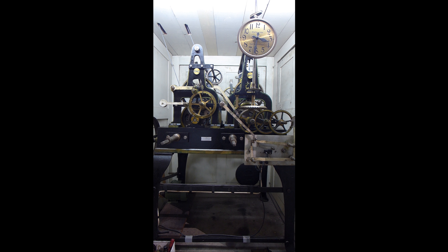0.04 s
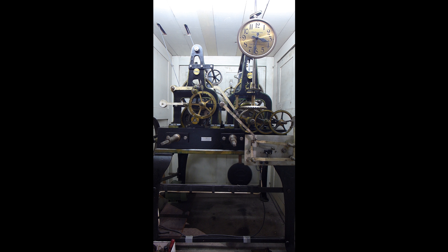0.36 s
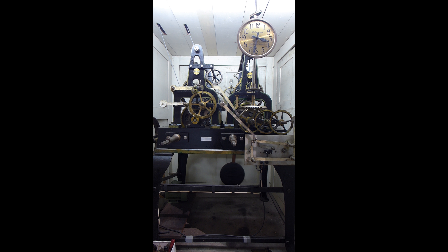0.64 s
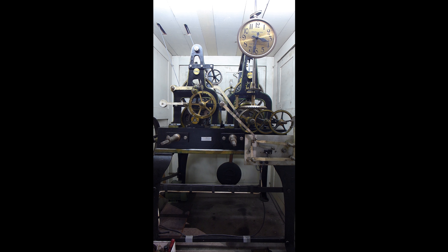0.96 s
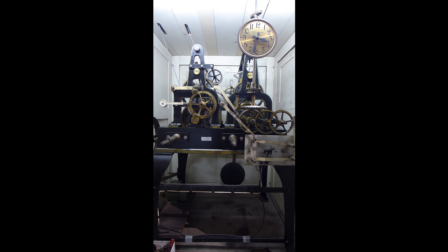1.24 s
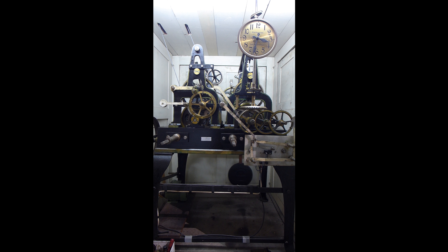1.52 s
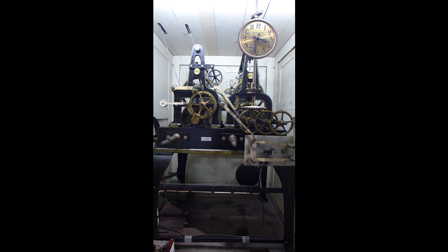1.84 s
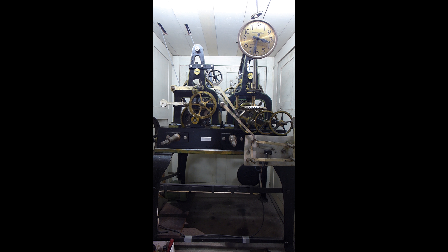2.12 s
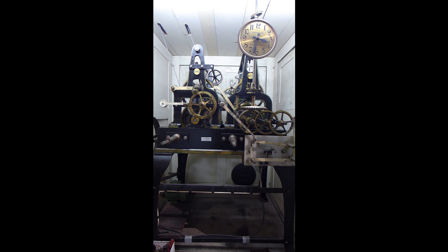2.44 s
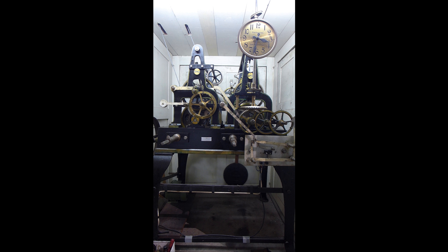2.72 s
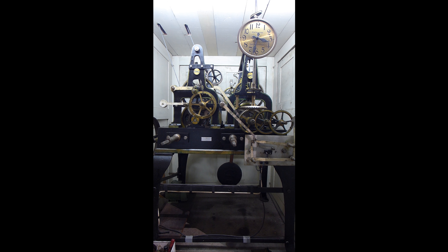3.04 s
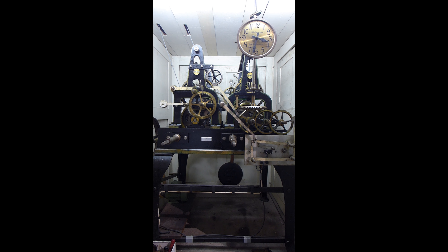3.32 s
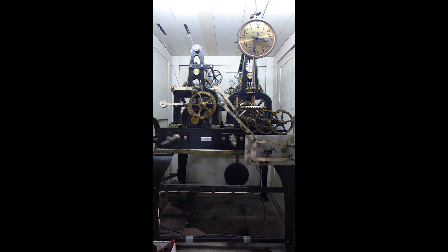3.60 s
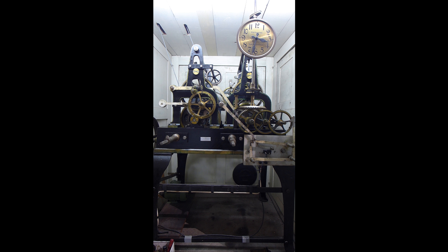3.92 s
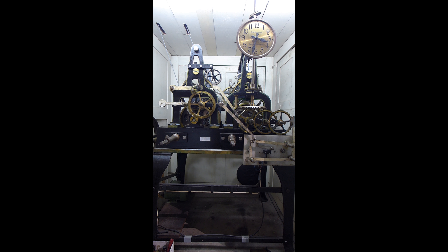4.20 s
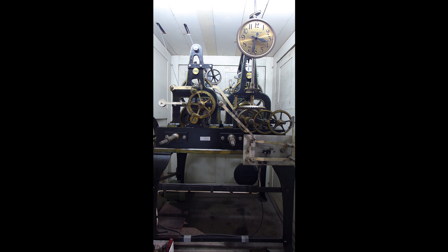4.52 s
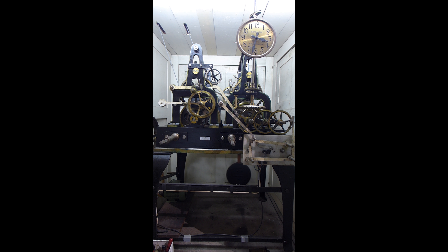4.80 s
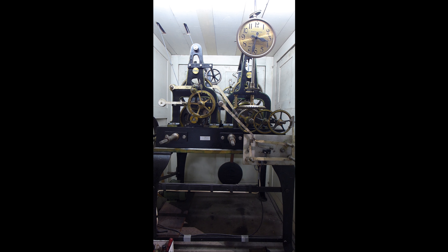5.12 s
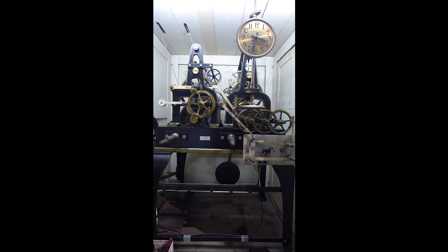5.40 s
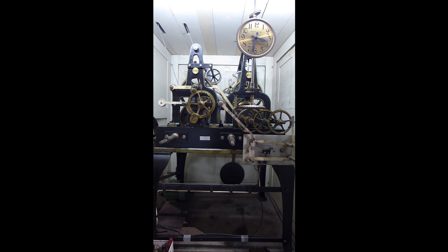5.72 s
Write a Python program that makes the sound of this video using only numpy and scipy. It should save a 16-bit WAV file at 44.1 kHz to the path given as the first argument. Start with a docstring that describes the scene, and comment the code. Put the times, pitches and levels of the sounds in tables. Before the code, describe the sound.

A large tower clock works a few steps away in a bare, echoing room, over a quiet, steady rumble. Its gears whirr from the start. A lever scrapes thinly on steel from about 0.4 seconds, drops with a loud, bright clack at 0.5, and keeps scraping and rattling lightly. At 1.2 seconds the gears slam against their stop, the loudest sound, with a metallic ring and a long echo. The whirr dies away between about 1.5 and 2.5 seconds. The pendulum mechanism knocks at roughly 0.5, 1.6, 2.8, 3.9 and 5 seconds, alternating between two slightly different tones. Each tick is a dull knock with a steel clink, followed by soft rebounds and a faint low boom. From 2.2 seconds to the end near 6 seconds, tiny dry clicks sound close by, with a quick cluster around 3.7 seconds.

```python
"""A large tower clock works in its bare, echoing room, a few steps away, over a quiet rumble.
Its wheel train whirrs, a lifting lever scrapes on its cam and drops with a clack, and the train slams
against its stop. The escapement knocks at every pendulum swing, on its two pallets in turn.
Each blow is a noise crack and clatter, ringing modes and a room tail. Tiny dry clicks sound close by."""
import sys
import numpy as np
from scipy import signal
from scipy.fft import rfft, irfft, next_fast_len
from scipy.io import wavfile

SR = 44100
rng = np.random.default_rng(int(sys.argv[2]) if len(sys.argv) > 2 else 0)


def to_wav(s):
    """Save 16-bit WAV."""
    ch = np.atleast_2d(s).T  # columns
    pcm = np.round(np.clip(ch, -1, 1) * 32767)  # PCM
    wavfile.write(sys.argv[1], SR, pcm.astype(np.int16))


N = 262395
TIME_S = np.arange(N) / SR
AGE_S = TIME_S[:2 * SR + SR // 2]  # time since a blow

# Lever rubbing on its cam. Each row: start in seconds, fade start in seconds, level in dB.
SCRAPES = [(-.25, .14, -54), (0.35, 0.737, -39), (0.739, 1.2, -42.5)]
# Lever drop and rattle. Each row: start in seconds, level in dB.
LEVER_HITS = [(.122, -52), (.455, -46.5), (.5117, -18), (.824, -47), (.96, -52.5), (1.011, -37),
              (1.09, -50.5)]
# Pendulum swings. Each row: start in seconds, unlocking knock in dB, tooth landing in dB.
SWINGS = [(.522, -33.5, -25), (1.632, -34, -32), (2.752, -35, -32), (3.857, -34, -30.5),
          (4.971, -28.5, -28)]
# Entry pallet, then exit pallet. Each row: delay after the knock in seconds, rise in seconds, ring in dB.
LANDINGS = [(.014, 0.0036, 2.5), (.005, 0.0083, 3.5)]
# Wheel rebounds on each pallet. Each row: delay after the knock in seconds, level in dB.
ENTRY_REBOUNDS = [(.158, -37.5), (.197, -35.5), (.318, -40)]
EXIT_REBOUNDS = [(.203, -41.5), (.246, -41)]
# Stop arm touches, slides, locks. Each row: start in seconds, level in dB, tilt in dB per octave.
STOP_HITS = [(1.1963, -24.5, -0.5), (1.2016, -20.5, 0.5), (1.206, -20, 1.6)]
# Dry clicks. Each row: start in seconds, level in dB.
CLICKS = [(2.2308, -50), (2.355, -48), (3.6321, -49), (3.7045, -44), (3.7609, -42.5), (3.8152, -43.5),
          (4.4089, -50), (4.8424, -47), (5.3607, -45.5), (5.5149, -45), (5.6496, -45), (5.8606, -44)]

# Noise spectra of the sources. Each row: frequency in Hz, relative density in dB.
RUMBLE_COLOUR = [(25, -5.5), (50, -20), (100, -12.5), (210, 6.5), (500, 0), (1200, -1.5), (2000, -10),
                 (3400, -21), (3980, -26), (4400, -19), (6200, -23), (7500, -24), (11000, -26),
                 (15500, -35)]
WHINE_COLOUR = [(3600, -38), (3900, -1), (4040, -2), (4350, -40.5)]
WHIRR_COLOUR = [(40, -32), (100, -13.5), (210, 0), (440, 2), (700, -2.5), (1400, -3.5), (2200, -11.5),
                (4000, -16), (6000, -19.5), (14000, -45)]
SCRAPE_COLOUR = [(500, -26.5), (2000, -6), (3500, 0.5), (5500, -1.5), (7000, -19), (10000, -24.5),
                 (13500, -42.5)]
LEVER_COLOUR = [(100, -52), (400, -3.5), (1000, -18), (1900, -14), (2500, 7), (4000, -2.5), (6300, 4),
                (7700, 0), (8800, 2), (11300, -3.5), (12700, -14), (15500, -26)]
KNOCK_COLOUR = [(70, -31.5), (150, -15), (300, -9.5), (480, -1.5), (800, -13), (1500, -2.5), (2400, -2),
                (3100, -20.5), (6000, -20), (12000, -35)]
LANDING_COLOUR = [(60, -37.5), (110, -25.5), (220, -4), (380, -10), (480, 3.5), (720, -3), (1800, -6.5),
                  (3000, -11), (4000, -17.5), (5000, -10.5), (6400, -14), (9000, -24.5), (12000, -32),
                  (15500, -45)]
FLOOR_COLOUR = [(50, -51), (72, -22.5), (92, 0.5), (120, 0.5), (150, -5), (300, -39), (800, -74.5)]
REBOUND_COLOUR = [(60, -29.5), (110, -6.5), (300, -11.5), (480, 14.5), (750, -11.5), (2000, -16),
                  (6000, -27), (12000, -46)]
STOP_COLOUR = [(70, -23), (200, -30.5), (400, -2.5), (700, 4), (1500, 7), (2300, 3), (5000, 3.5),
               (8000, -2), (9200, -2), (10300, 3), (12800, -3), (13800, -14), (15500, -24.5)]

# Modes of the steel parts. Each row: frequency in Hz, relative level in dB, T60 in seconds.
SCRAPE_MODES = [(3130, -14, .06), (3521, -12, .06), (3800, -15, .08), (5700, -21, .08), (6010, -19, .25),
                (8021, -19, .15), (8180, -19, .07), (8580, -25, .1), (10160, -19, .04), (12850, -31, .03)]
LEVER_MODES = [(2535, -16, 0.36), (2721, -16, 0.41), (2950, -17, 0.67), (3768, -13, 0.36),
               (4118, -19, 0.41), (4519, -20, 0.55), (4874, -17, 0.41), (5291, -21, 0.42),
               (5420, -20, 0.53), (5832, -17, 0.39), (5999, -21, 0.79), (6136, -15, 0.36),
               (6325, -18, 0.55), (6747, -14, 0.29), (6839, -19, 0.35), (7095, -19, 0.26),
               (8502, -18, 0.56), (8863, -15, 0.27), (9235, -18, 0.26), (9964, -19, 0.26),
               (11243, -23, 0.27), (12691, -29, 0.28)]
FRAME_MODES = [(366, -15, .8), (474, -6, .45), (512, -10, .45), (594, -16, 1.2), (928, -19, 1.1),
               (987, -23, 1), (1149, -21, .77), (1364, -19, .62), (1423, -19, .75), (1719, -23, 1.2),
               (1763, -10, .4), (2234, -22, .5)]
ENTRY_PALLET_MODES = [(3531, -23, 0.55), (4449, -23, 0.33), (4958, -19, 0.51), (5550, -25, 0.42),
                      (5722, -22, 0.44), (6142, -14, 0.31), (6575, -26, 1.05), (7138, -25, 0.51),
                      (7267, -25, 0.46), (8333, -29, 0.77), (10034, -26, 0.26), (10435, -28, 0.34),
                      (11800, -28, 0.28)]
EXIT_PALLET_MODES = [(3400, -26, .9), (3590, -28, .9), (4005, -22, .7), (4777, -22, .42), (4970, -22, .7),
                     (5316, -25, .6), (7926, -9, .3), (8107, -15, .47), (9108, -30, .35), (10868, -28, .32),
                     (11762, -31, .32)]
STOP_MODES = [(686, -26, 1.3), (1117, -24, 1.1), (1337, -20, 1.8), (1420, -23, 1.6), (1530, -21, 1.5),
              (1819, -21, .65), (2177, -25, 1.1), (2460, -24, .72), (3052, -25, .97), (3520, -28, .9),
              (4010, -21, .43), (4293, -24, .6), (4363, -23, .53), (5096, -21, .7), (5622, -22, .52),
              (5695, -18, .55), (6012, -16, .6), (6616, -18, .32), (6686, -22, .39), (7283, -25, .53),
              (8019, -15, .7), (8201, -17, .5), (9684, -22, .3), (10171, -17, .3), (10362, -21, .3),
              (11132, -19, .3), (12066, -21, .24), (12830, -22, .35)]
STOP_FACE_MODES = [(1633, -11.5, 0.0393), (6470, -9.5, 0.03043), (10050, 0.5, .04)]

# Room tail spectrum. Each row: frequency in Hz, gain in dB.
ROOM_GAIN_DB = [(100, 9.5), (250, 8), (500, -4), (1400, -6), (4000, -6.5), (12000, -3.5)]
# Room decay. Each row: frequency in Hz, T60 in seconds.
ROOM_T60_S = [(100, 1.9), (250, 2.16), (600, 3.6), (1400, 2.91), (3000, 1.82), (5500, 1.345), (8000, 1.028),
              (13000, 0.37)]
# Stereo width. Each row: frequency in Hz, side relative to mid in dB.
SIDE_DB = [(30, -10), (150, -19), (300, -23), (700, -10.5), (1400, -8), (8000, -5.5), (14000, -3.5)]


def gain(db):
    """Decibels to amplitude."""
    return 10 ** (np.asarray(db) / 20)


def lookup(table, hz):
    """Table value, interpolated over log frequency."""
    table_hz, values = np.transpose(table)
    return np.interp(np.log(hz + 1), np.log(table_hz), values)


def tilted(table, db_per_octave):
    """Spectrum or mode table tilted about 2 kHz."""
    return [(hz, db + db_per_octave * np.log2(hz / 2000), *rest) for hz, db, *rest in table]


def add(mix, start_s, sound):
    """Mixes in a stereo sound."""
    part = mix[:, max(round(start_s * SR), 0):][:, :sound.shape[1]]
    part += sound[:, :part.shape[1]]


def stereo(mid, side, hz):
    """Mid and side to left and right, narrow in the bass."""
    side = side * gain(lookup(SIDE_DB, hz))
    return np.array([mid + side, mid - side])


def noise(colour, size):
    """Coloured stereo noise, mid at unit rms."""
    fft_size = next_fast_len(size)
    hz = np.fft.rfftfreq(fft_size, 1 / SR)
    shape = gain(lookup(colour, hz))
    mid, side = rfft(rng.standard_normal((2, fft_size))) * shape / np.sqrt(np.mean(shape ** 2))
    return irfft(stereo(mid, side, hz), fft_size)[:, :size]


def flutter(depth_db, rate_hz):
    """Randomly wavering gain."""
    knots_s = np.arange(0, TIME_S[-1] + 1, 1 / rate_hz)
    return gain(depth_db * np.interp(TIME_S, knots_s, rng.standard_normal(len(knots_s))))


def held(db, until_s, fade_db_per_s):
    """Gain that holds, then fades."""
    return gain(db - fade_db_per_s * np.maximum(TIME_S - until_s, 0))


def ring(modes, age_s, wander_hz=28, tail_db=-9):
    """Decaying sines; echoes prolong each and make it waver, differently left and right."""
    out = np.zeros((2, len(age_s)))
    for hz, db, t60_s in modes:
        room_t60_s = max(t60_s, lookup(ROOM_T60_S, hz))
        ring_s = age_s[age_s < min(room_t60_s, 2 * t60_s)]
        knots_s = np.arange(256) / (wander_hz * (1 + hz / 5000))
        scatter = rng.standard_normal((2, 256)) + 1j * rng.standard_normal((2, 256))
        tail = np.sqrt(t60_s) * gain(tail_db - 60 * knots_s / room_t60_s)  # long modes feed the room more
        fade = np.hypot(gain(-60 * knots_s / t60_s), tail)
        wavering = scatter * fade
        mid, side = wavering * np.linalg.norm(fade) / np.linalg.norm(wavering, axis=1, keepdims=True)
        tone = gain(db) * np.sqrt(2) * np.exp(2j * np.pi * hz * ring_s)
        for channel, envelope in zip(out, stereo(mid, side, hz)):
            channel[:len(ring_s)] += (tone * np.interp(ring_s, knots_s, envelope)).real
    return out


def room_tail(colour, bloom_cycles=11):
    """Diffuse echo: bass builds late, treble dies first."""
    hz, age_s, spectra = signal.stft(noise(colour, len(AGE_S)), SR, nperseg=512)
    hz = hz[:, None]
    fade = gain(lookup(ROOM_GAIN_DB, hz) - 60 * age_s / lookup(ROOM_T60_S, hz))
    bloom = 1 - np.exp(-age_s / (0.036 + bloom_cycles / (hz + 20)))
    _, tail = signal.istft(spectra * bloom * fade, SR, nperseg=512)
    return tail[:, :len(AGE_S)]


def blow(db, rise_s, colour, modes, modes_db, crack_db, crack_t60_s, clatter_t60_s, room_db):
    """One impact: crack, clatter of frame and near walls, ringing modes, room tail."""
    crack = gain(crack_db - 60 * AGE_S / crack_t60_s)
    clatter = gain(-60 * AGE_S / clatter_t60_s)
    burst = noise(colour, len(AGE_S)) * np.hypot(crack, clatter)
    ringing = gain(modes_db) * ring(modes, AGE_S)
    attack = 1 - np.exp(-AGE_S / max(rise_s, 1e-4))
    return gain(db) * attack * (burst + ringing + gain(room_db) * room_tail(colour))


def rumble(air_db=-51, whine_db=-72.5):
    """Steady air and distant noise in the tower, with a faint wavering whine."""
    air = gain(air_db) * noise(RUMBLE_COLOUR, N) * flutter(depth_db=0.5, rate_hz=7)
    whine = gain(whine_db) * noise(WHINE_COLOUR, N) * flutter(depth_db=1.5, rate_hz=18)
    return air + whine


def wheel_train(level_db=-41.5, coast_s=0.33):
    """Wheels whirr evenly, coast briefly after the stop, then die away."""
    stop_s = STOP_HITS[0][0]
    running = held(level_db, stop_s + coast_s, fade_db_per_s=31)
    return noise(WHIRR_COLOUR, N) * running * flutter(depth_db=0.3, rate_hz=40)


def lever_scrape(attack_s=0.22, hiss_db=-0.5, singing_db=-2):
    """The lever sticks and slips up its cam; the slips ring thin steel."""
    rubbing = np.zeros(N)
    for start_s, until_s, db in SCRAPES:
        attack = np.clip((TIME_S - start_s) / attack_s, 0, 1) ** 2
        rubbing += attack * held(db, until_s, fade_db_per_s=85)
    slips = rubbing * flutter(depth_db=3.5, rate_hz=60)
    steel = ring(SCRAPE_MODES, AGE_S[:SR])
    friction = slips * rng.standard_normal((1, N))
    singing = signal.oaconvolve(friction, steel, axes=1)[:, :N] / np.linalg.norm(steel[0])
    return gain(hiss_db) * slips * noise(SCRAPE_COLOUR, N) + gain(singing_db) * singing


def lever_drop(hard_db=-26, hard_rise_s=0.00027, db_per_doubling=5):
    """The lever rattles and falls off its cam with a bright clack; softer hits rise more slowly."""
    out = np.zeros((2, N))
    for start_s, db in LEVER_HITS:
        rise_s = hard_rise_s * 2 ** ((hard_db - db) / db_per_doubling)
        clack = blow(db, rise_s, LEVER_COLOUR, LEVER_MODES, modes_db=0,
                     crack_db=-6, crack_t60_s=0.087, clatter_t60_s=0.19, room_db=-11)
        add(out, start_s, clack)
    return out


def unlocking_knock(db, rise_s=0.0031):
    """The escapement unlocks; the frame rings dully."""
    return blow(db, rise_s, KNOCK_COLOUR, FRAME_MODES, modes_db=-1.5,
                crack_db=-13, crack_t60_s=0.039, clatter_t60_s=0.1, room_db=-14)


def tooth_landing(db, rise_s, pallet_modes, pallet_db, neutral_db=-29.3):
    """A tooth clinks on a pallet; harder is brighter."""
    db_per_octave = 0.42 * (db - neutral_db)
    clink = [(hz, mode_db + pallet_db, t60_s) for hz, mode_db, t60_s in pallet_modes]
    colour = tilted(LANDING_COLOUR, db_per_octave)
    modes = tilted(FRAME_MODES + clink, db_per_octave)
    return blow(db, rise_s, colour, modes, modes_db=-2.5,
                crack_db=-10, crack_t60_s=0.029, clatter_t60_s=0.27, room_db=-7.5)


def floor_boom(db, peak_s=0.1584):
    """The wooden floor takes up a blow slowly and booms softly."""
    progress = AGE_S / peak_s
    swell = (progress * np.exp(1 - progress)) ** 3
    return gain(db) * swell * noise(FLOOR_COLOUR, len(AGE_S))


def wheel_rebound(db, rise_s=0.0067):
    """The heavy wheel rebounds, ringing the lowest frame modes."""
    return blow(db, rise_s, REBOUND_COLOUR, FRAME_MODES[:4], modes_db=-2.5,
                crack_db=-4, crack_t60_s=0.056, clatter_t60_s=0.174, room_db=-20)


def escapement(boom_offset_db=-25):
    """Each swing: knock, landing, boom, rebounds. Entry and exit pallets alternate."""
    out = np.zeros((2, N))
    pallets = [(ENTRY_PALLET_MODES, ENTRY_REBOUNDS), (EXIT_PALLET_MODES, EXIT_REBOUNDS)]
    for swing, (start_s, knock_db, landing_db) in enumerate(SWINGS):
        pallet_modes, rebounds = pallets[swing % 2]
        delay_s, rise_s, pallet_db = LANDINGS[swing % 2]
        add(out, start_s, unlocking_knock(knock_db))
        add(out, start_s + delay_s, tooth_landing(landing_db, rise_s, pallet_modes, pallet_db))
        add(out, start_s, floor_boom(knock_db + boom_offset_db))
        for after_s, db in rebounds:
            add(out, start_s + after_s, wheel_rebound(db))
    return out


def train_stop(rise_s=0.00062):
    """The running train slams into its stop and shakes the frame."""
    out = np.zeros((2, N))
    for start_s, db, db_per_octave in STOP_HITS:
        colour = tilted(STOP_COLOUR, db_per_octave)
        modes = tilted(STOP_MODES + STOP_FACE_MODES, db_per_octave)
        slam = blow(db, rise_s, colour, modes, modes_db=2.5,
                    crack_db=8.5, crack_t60_s=0.04, clatter_t60_s=0.16, room_db=0)
        add(out, start_s, slam)
    return out


def clicks(resonance_hz=6400, peak_s=0.00089, trim_db=-2):
    """Tiny dry clicks: one high, well damped resonance plus grit."""
    out = np.zeros((2, N))
    age_s = AGE_S[:SR // 100]
    envelope = age_s / peak_s * np.exp(1 - age_s / peak_s)
    for start_s, db in CLICKS:
        tone = np.sin(2 * np.pi * resonance_hz * rng.uniform(0.934, 1.03) * age_s)
        grit = 0.4 * noise([(2500, -25), (5000, 0), (10000, -4), (15000, -18)], len(age_s))
        add(out, start_s, gain(db + trim_db) * envelope * (tone + grit))
    return out


def scene(pan_db=0.55):
    """All sources, panned slightly right."""
    mix = rumble() + wheel_train() + lever_scrape() + lever_drop() + escapement() + train_stop() + clicks()
    return mix * gain([[-pan_db], [pan_db]])


def record(dry, ceiling=0.92, cutoff_hz=15800):
    """Hard clip, then low-pass."""
    clipped = np.clip(dry, -ceiling, ceiling)
    lowpass = signal.firwin(255, cutoff_hz, window=("kaiser", 9), fs=SR)
    return signal.oaconvolve(clipped, lowpass[None], "same")


dry = scene()
out = record(dry)
to_wav(out)
```